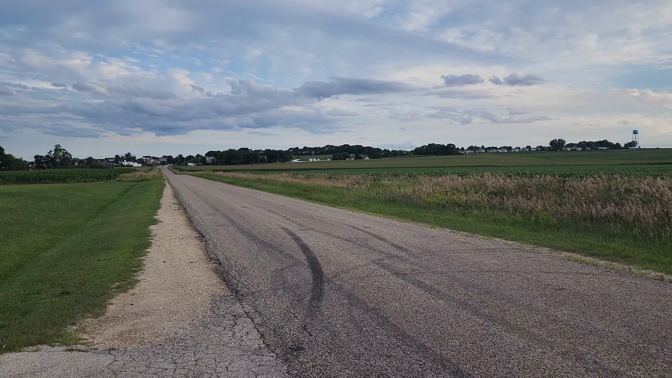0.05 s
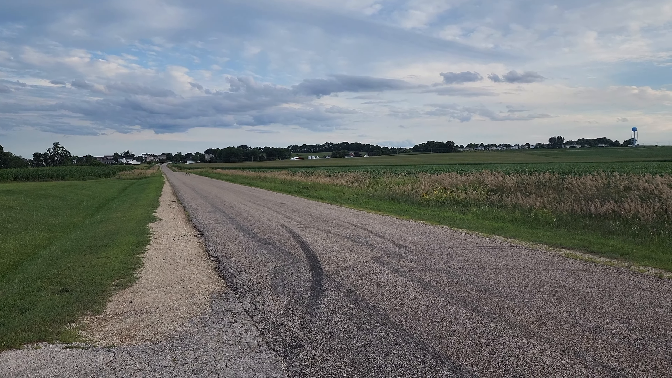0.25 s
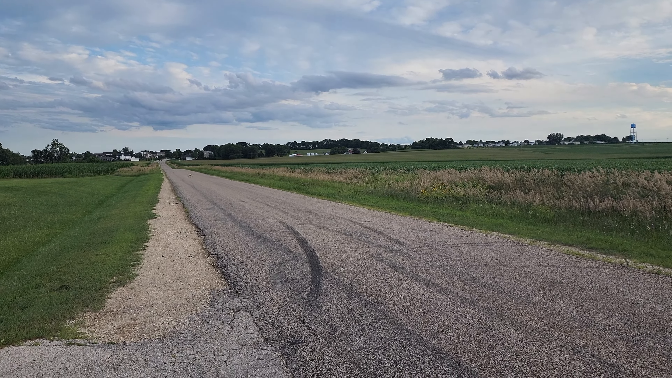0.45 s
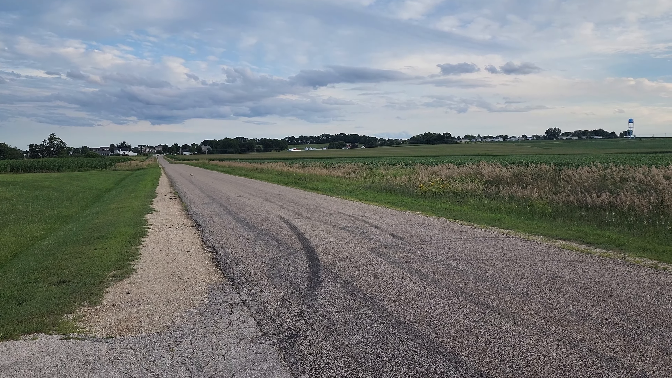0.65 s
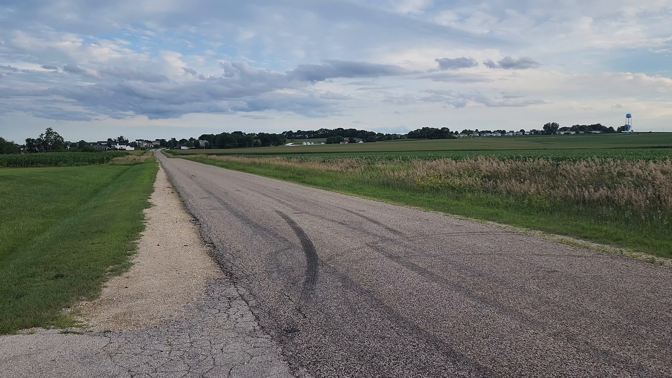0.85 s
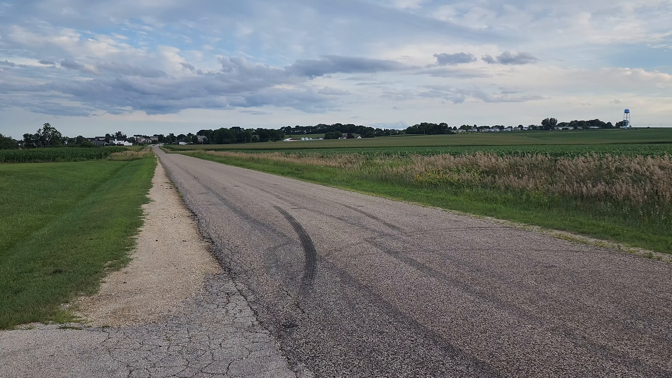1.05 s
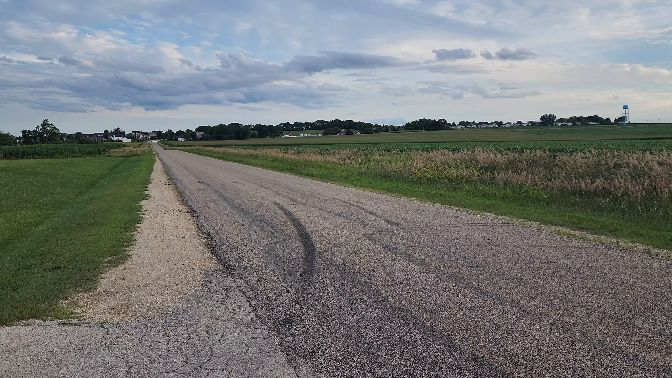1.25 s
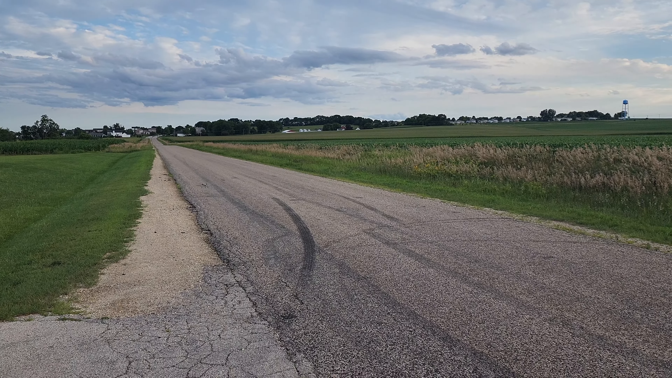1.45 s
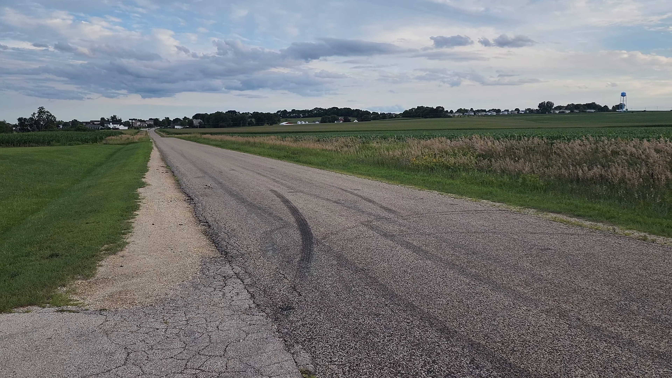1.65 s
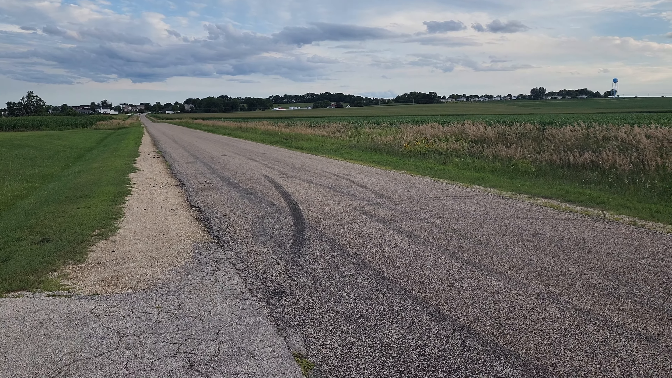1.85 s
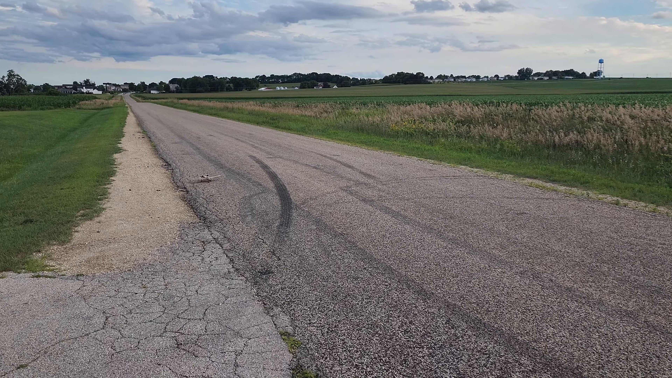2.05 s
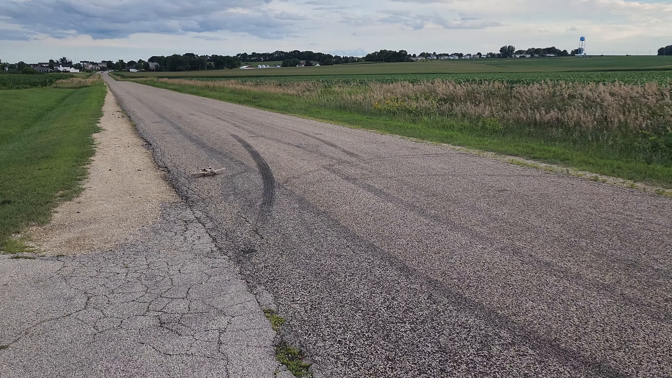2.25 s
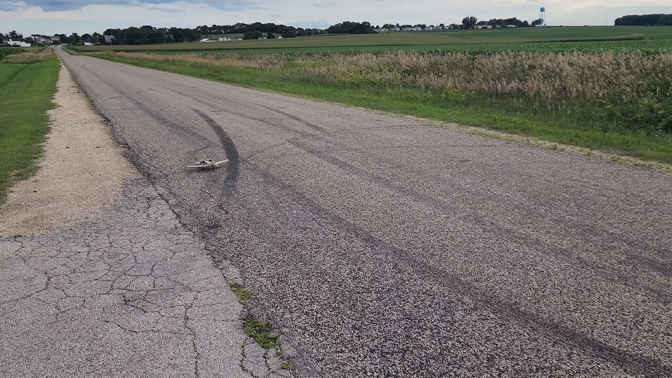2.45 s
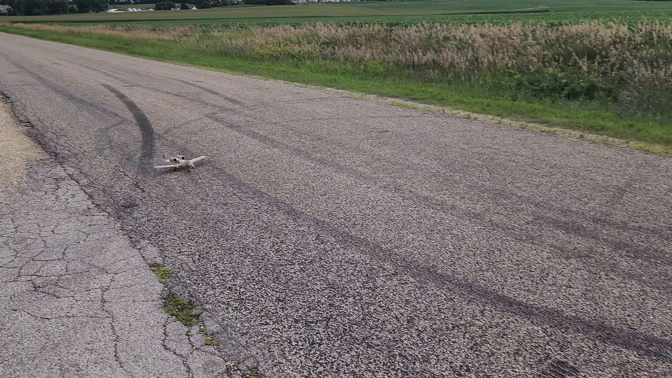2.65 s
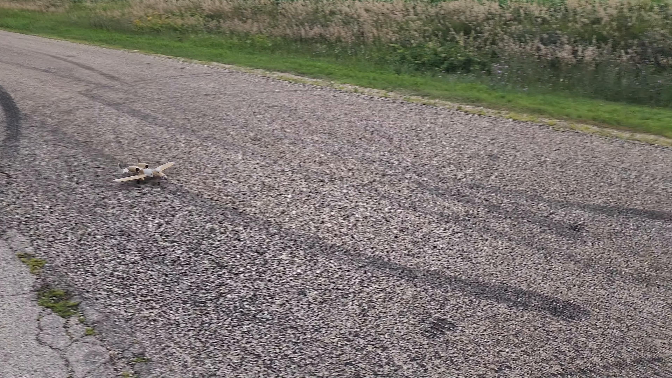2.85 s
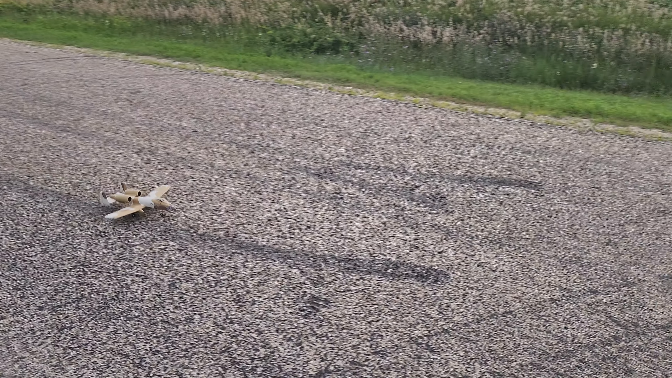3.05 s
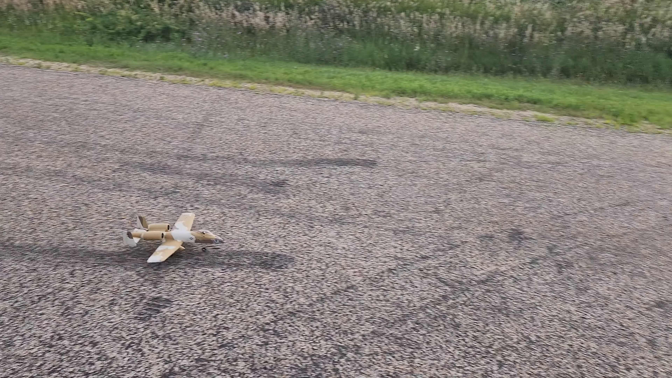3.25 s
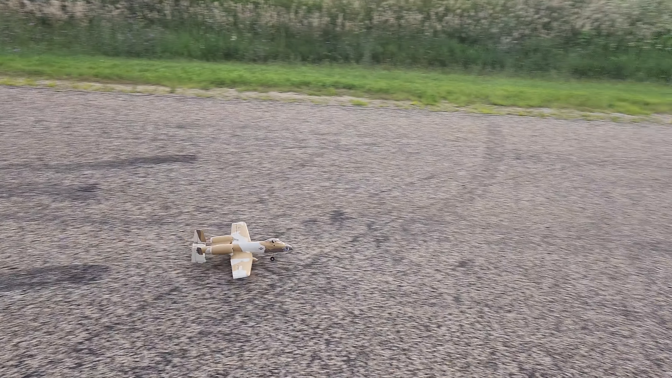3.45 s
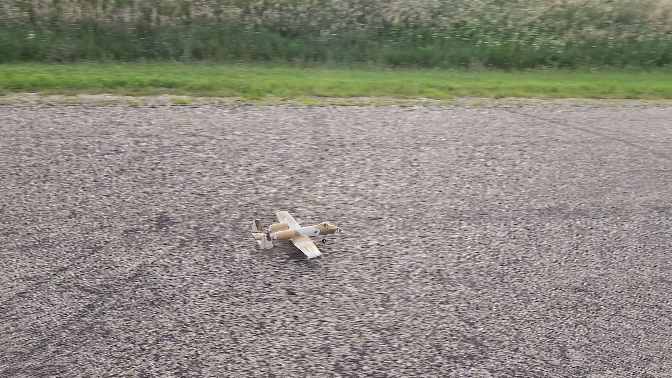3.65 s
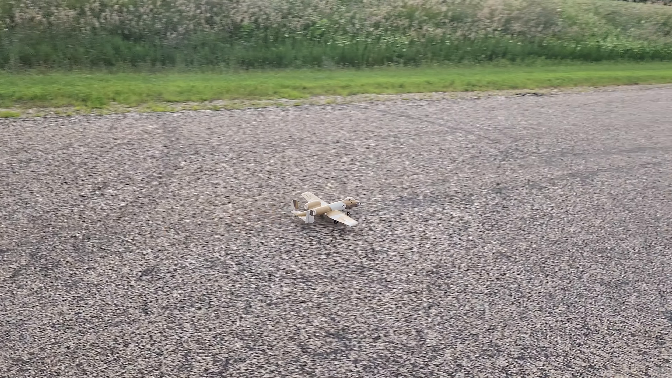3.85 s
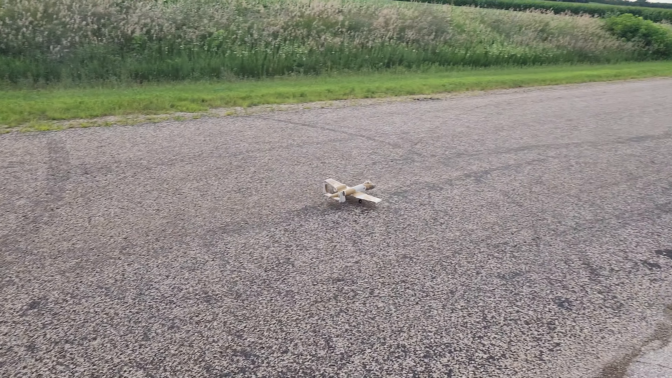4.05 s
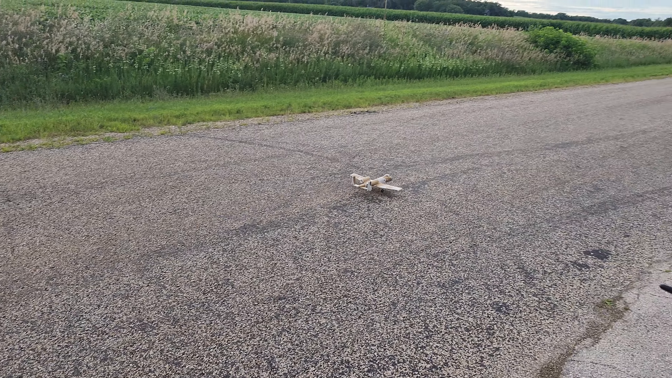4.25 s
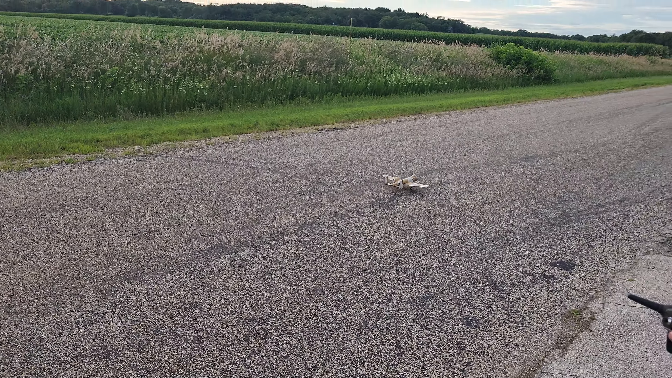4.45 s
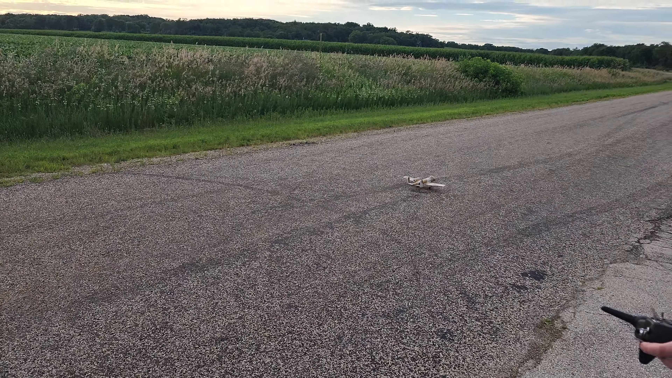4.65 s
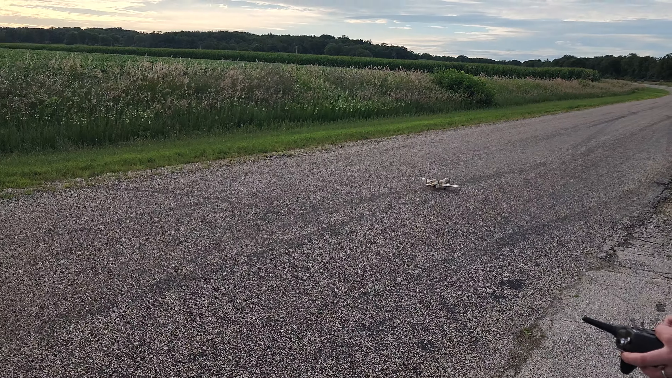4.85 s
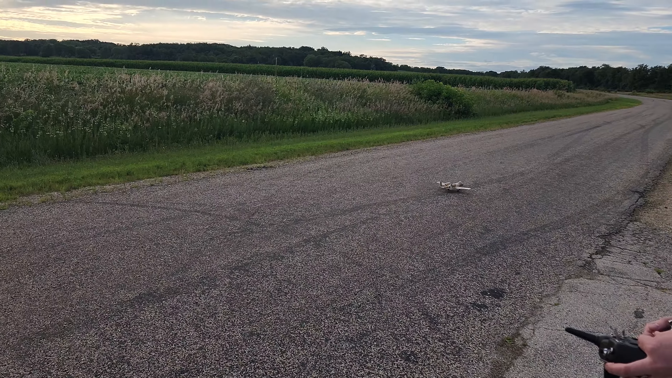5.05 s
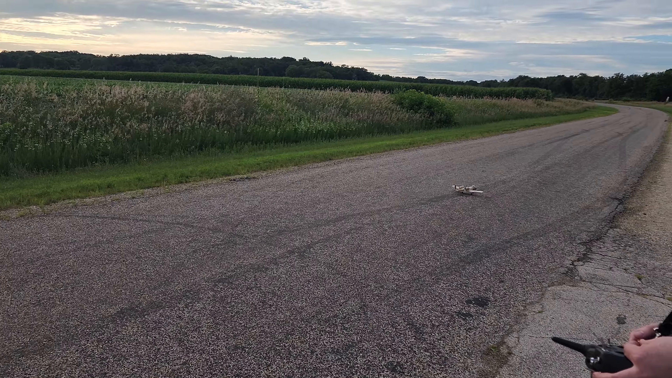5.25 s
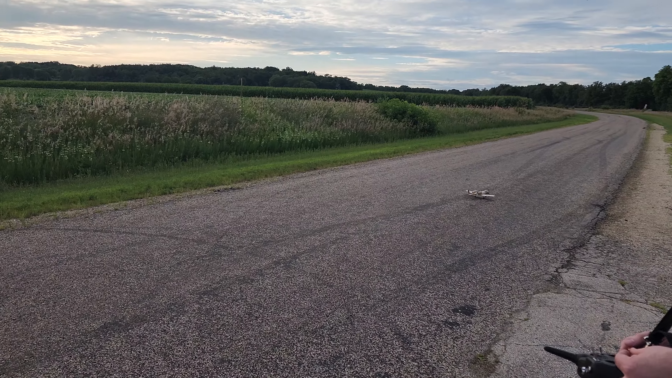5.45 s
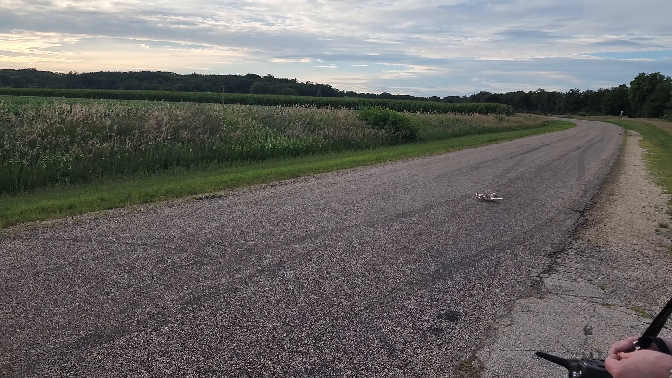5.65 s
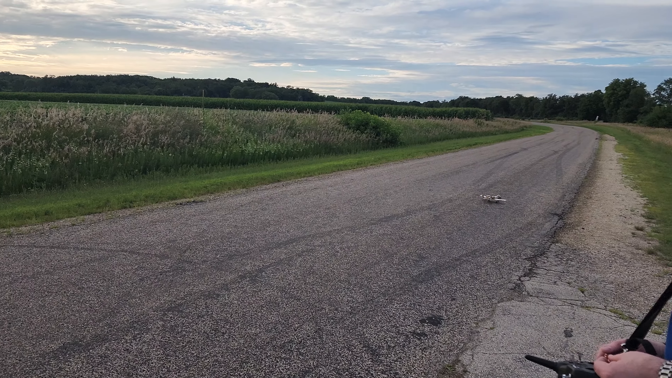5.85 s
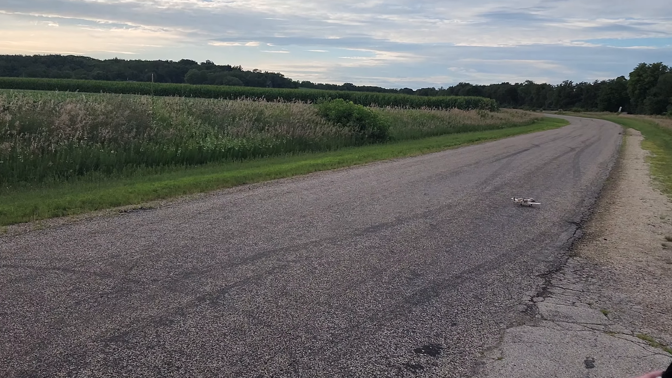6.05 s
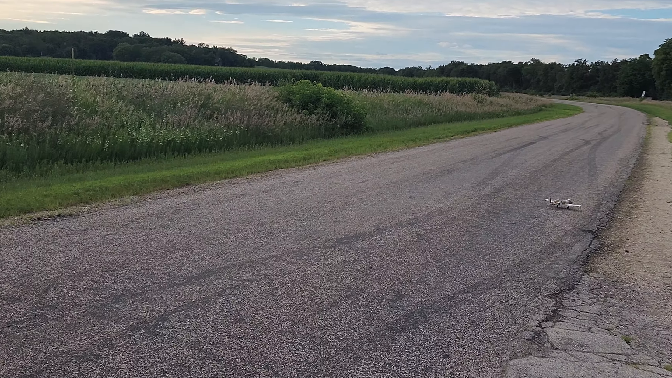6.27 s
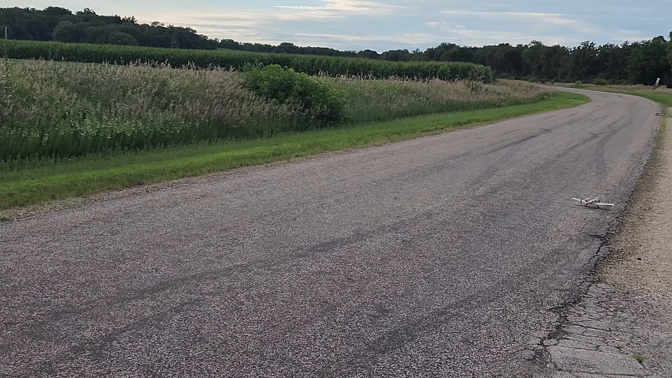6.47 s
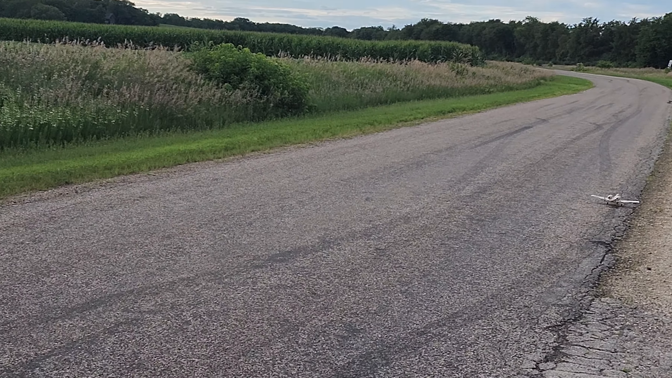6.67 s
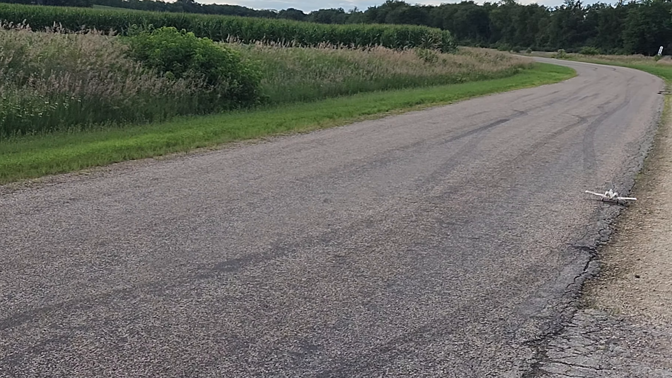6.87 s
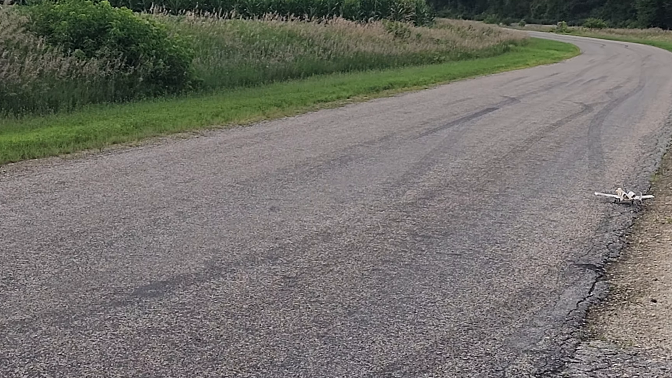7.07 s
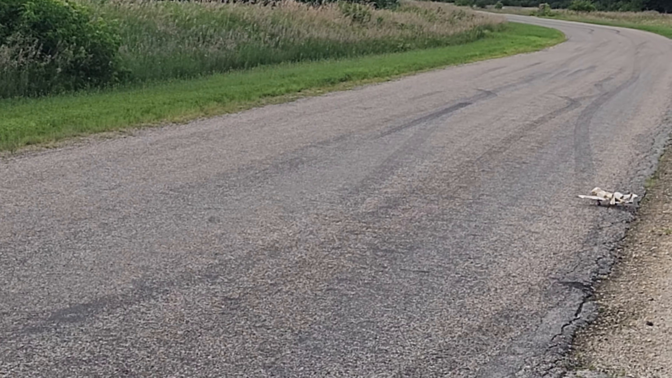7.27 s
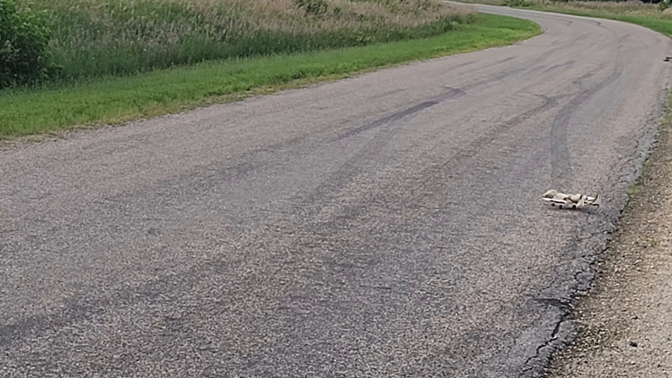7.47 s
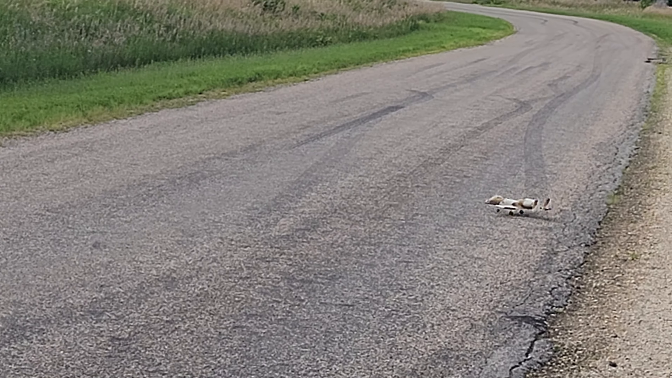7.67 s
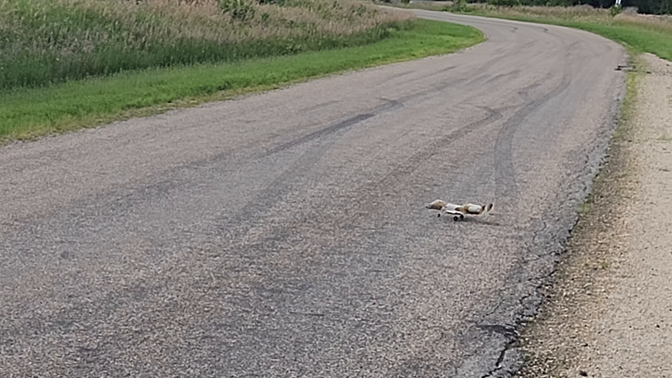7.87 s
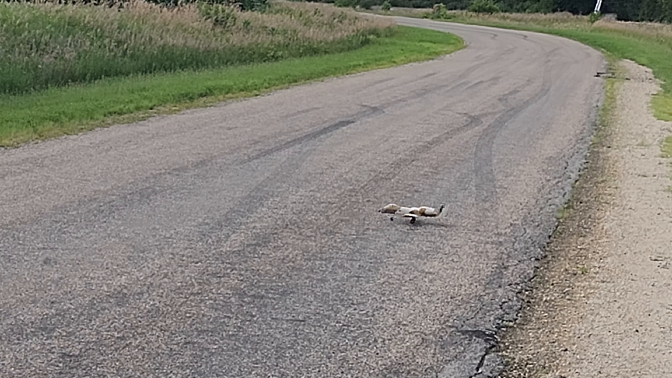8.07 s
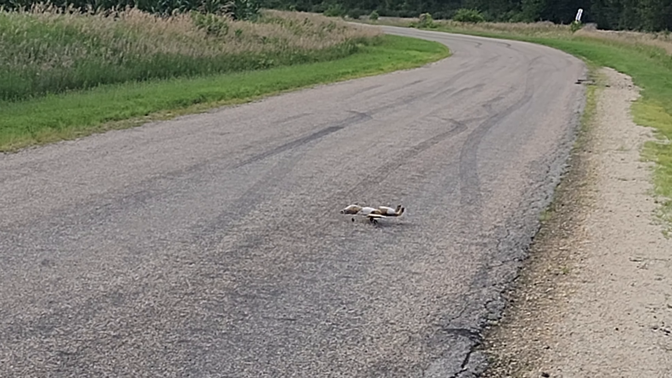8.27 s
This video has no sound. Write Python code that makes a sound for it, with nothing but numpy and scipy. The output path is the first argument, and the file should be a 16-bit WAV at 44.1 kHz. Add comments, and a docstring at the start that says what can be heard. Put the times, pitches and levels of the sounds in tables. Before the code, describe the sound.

A small electric model jet whines in, lands and rattles past on gritty asphalt, then its fans restart and rise in pitch.

```python
"""Model jet landing on asphalt

Open field, a hand-held stereo pair beside a coarse asphalt strip. A small jet with two electric ducted
fans glides in whining, throttles back, lands and rolls by 2 m away, grit drumming on its foam body.
It turns round, the fans start again, and it taxis back with two steps of throttle. Light wind rumbles
on the microphones, the hand knocks the case, a finger rubs the left port; far off, a bird chirps."""
import sys
import numpy as np
from scipy import signal
from scipy.fft import rfft, irfft, next_fast_len
from scipy.io import wavfile
from scipy.ndimage import uniform_filter1d, map_coordinates

SR = 44100
rng = np.random.default_rng(int(sys.argv[2]) if len(sys.argv) > 2 else 0)


def bounce(signal):
    """Save signal as a 16-bit WAV file at the path given by the first command-line argument."""
    frames = np.transpose(np.atleast_2d(signal))
    limited = np.clip(frames, -1, 1)
    pcm = np.round(limited * 32767).astype(np.int16)
    wavfile.write(sys.argv[1], SR, pcm)


N = 366468
TIME = np.arange(N) / SR

# the breeze freshens at the microphones: (time [s], level [dB])
BREEZE = [(0, -55), (2.5, -52.5), (5, -53), (5.7, -49.5), (8.31, -47)]
# gusts and lulls on top of it: (time [s], half-length [s], gain [dB])
GUSTS = [(0.042, 0.097, 4.5), (1.787, 0.13, 5.5), (2.79, .2, -1.5), (3.1, 0.11, 3.5), (3.39, 0.29, 0),
         (4.722, 0.055, 7), (6.787, 0.25, 3.5), (7.94, 0.13, 5)]
# wind on the ports, and the hush of the field: (frequency [Hz], level [dB])
RUMBLE_COLOUR = [(20, -12), (45, 1.5), (100, 2), (190, -6), (280, -14.5), (450, -38), (1000, -67)]
FIELD_COLOUR = [(100, 14), (500, -2), (850, 9), (1300, 1.5), (2500, -6), (4000, -7), (8000, -4),
                (15000, -24)]

# throttle on the approach: (time [s], blade-passing target [Hz], lag [s], blade tone [dB], whine [dB])
LANDING_THROTTLE = [(0, 3021, .1, -52, -79), (.19, 2969.5, 0.23, -51, -81), (1.36, 2900.5, .22, -49.5, -56),
                    (1.865, 2969, 0.0154, -47.5, -65), (1.92, 2803, .06, -66, -68),
                    (1.995, 2110, .014, -48.5, -44), (2.06, 2100, .03, -55, -42.5),
                    (2.11, 1999.5, .17, -62, -46), (2.25, 1.5, 0.23, -50, -52), (2.3, 1.5, .29, -50, -115)]
# how far the second fan's blade tone lies below the first: (time [s], beat [Hz])
LANDING_BEAT = [(0, 124), (1.99, 106), (2.03, 80), (2.25, 70), (2.5, 30)]
TAXI_BEAT = [(7.8, 8), (8.0, 25), (8.04, 27), (8.075, 9), (8.15, 15), (8.31, 29)]
# lines of the motor whine: (shaft order [multiple], level [dB])
LANDING_WHINE_ORDERS = [(24, 5), (33, -13), (40, -21), (56, -32)]
TAXI_WHINE_ORDERS = [(16, -5.5), (24, 0), (32, -15), (40, -9), (48, -18), (56, -17)]
# how well the motor housing radiates: (frequency [Hz], gain [dB])
MOTOR_SHELL = [(2900, -1), (4000, -18), (5200, -4.5), (6300, -3), (8500, -6.5), (10700, 8.5), (15000, 5)]
# lines that unequal blades make strong or weak: (shaft order [multiple], level over the others [dB])
LANDING_BUZZ_ORDERS = [(15, 3), (16, 5), (17, 6), (18, 0)]
TAXI_BUZZ_ORDERS = [(4, 7), (6, 2), (7, 4), (9, -7), (10, 10), (11, -2), (12, 3), (13, 2), (14, 3), (15, 7),
                    (16, -2), (17, -7), (18, 7), (19, 6), (20, 2), (23, 5)]
# nose on: intake hiss, blade buzz and the hollow rush of the glide: (frequency [Hz], level [dB])
INTAKE_HISS = [(300, -33), (850, 0.5), (1200, -3.5), (2400, 3), (3000, 7), (4200, -107), (5300, 5.5),
               (6400, 11), (7500, 0), (8800, -2), (10300, -7), (12500, -4), (15000, -10)]
INTAKE_BUZZ = [(400, -19), (1000, -63), (1460, -9), (2400, -22), (3300, 8), (4200, -23), (5500, -4),
               (6250, 2.5), (7200, -21), (8500, -8), (10300, -20), (12000, -4), (13000, -11), (15000, 4)]
GLIDE_RUSH = [(500, -37), (740, -2), (860, 3), (1000, -12), (1300, -22)]
# hiss and buzz swell and sink on the approach: (time [s], gain [dB])
APPROACH_SWELL = [(0, 5.5), (.2, 1), (.38, 1), (.7, 1.5), (1, 0.5), (1.18, -1), (1.5, 3), (1.85, 2),
                  (2.1, 0.5)]
# the echo off the asphalt closes in on the direct sound as the jet sinks: (time [s], delay [ms])
ROAD_ECHO = [(0, 0.48), (1.62, 0.13), (2.1, 0.15), (2.6, 0.16), (2.95, 0.16), (3.25, 0.16), (3.5, 0.15),
             (4.1, 0.15), (5.4, 0.15)]
# the jet's bearing from the microphones: (time [s], left port's lead [ms])
BEARING = [(0, 0.13), (2.5, 0.14), (3.15, 0.21), (3.5, 0.13), (4.05, 0.056), (4.65, -0.013), (5.5, -0.053),
           (6.3, -0.062), (7.05, -0.017), (7.7, 0.041)]
# the case shades the ports, for a source on each side: (frequency [Hz], left minus right [dB])
SHADE_LEFT = [(1000, 0), (2000, 2.5), (2700, 2), (4000, 1), (5300, -3), (6500, 3), (8000, 19), (9700, -19),
              (11000, 19), (12200, 13), (13500, 17), (15000, 15)]
SHADE_FRONT = [(1000, 1), (2000, -6), (2700, -1.5), (4000, 2), (5300, 5), (6500, -3.5), (8000, 1),
               (9700, 4), (11000, -19), (12200, 18), (13500, -2), (15000, 3)]
SHADE_RIGHT = [(1000, -5), (2000, 5), (2700, 6.5), (4000, 2.5), (5300, 12.5), (6500, 2.5), (8000, 30),
               (9700, -5.5), (11000, 15), (12200, 5), (13500, 11), (15000, 15)]

# the hand on the case: (time [s], pitch [Hz], level [dB], time to fall 60 dB [s])
KNOCKS = [(.338, 240, -34.5, 0.04)]
# a bird far out in the field: (time [s], length [s], start pitch [Hz], end pitch [Hz], level [dB])
CHIRPS = [(4.77, .15, 3150, 2650, -52), (1.679, .012, 2850, 2050, -56), (1.709, .013, 2050, 2800, -55),
          (1.724, .017, 2800, 1800, -54)]
# a dry scuff: (frequency [Hz], level [dB])
SCUFF_COLOUR = [(2500, -35), (3300, 1), (4100, 0), (4700, -8), (5500, -35)]

# wheel noise coming, abeam and going away: (frequency [Hz], level [dB])
ROLL_COMING = [(100, -36), (300, -11.5), (600, -7), (1100, 5.5), (1900, -5), (2600, 2), (4400, -19.5),
               (5500, -9), (6600, -7.5), (7600, -4), (8800, -11.5), (12000, -14), (13400, -23),
               (15000, -17)]
ROLL_BESIDE = [(100, -30), (300, -9.5), (700, -7), (1050, -9.5), (1400, -5), (2200, -4), (3000, -4),
               (4500, -8.5), (5700, -13), (7600, -13), (9000, -3.5), (11500, -17.5), (13200, -14.5),
               (15000, -10.5)]
ROLL_GOING = [(100, -31), (300, -10.5), (550, -13.5), (750, -7.5), (1060, -3), (1650, -9.5), (2000, 2),
              (2600, -9.5), (3300, 0), (4000, -5.5), (5300, -13.5), (6600, -15), (7700, -11.5),
              (10200, -8.5), (13300, -20), (15000, -12)]
# wheels hit road or stone: (time [s], level [dB], time to fall 60 dB [s], thud over rattle [dB])
BUMPS = [(2.146, -34, .14, -22), (2.218, -38, .08, -18), (2.415, -33, .16, -20), (2.568, -40, .06, -8),
         (2.705, -31, .008, -14), (2.865, -37, .08, -8), (3.101, -28, .012, -14), (3.32, -31, .06, -1),
         (3.374, -30, .05, -10), (3.553, -29, .07, -14), (3.63, -31, .05, -14), (3.756, -27, .05, -14),
         (3.818, -31, .05, -14), (3.917, -32, .04, -14), (3.946, -34, .04, -3), (3.972, -31, .06, -1),
         (4.048, -35, .03, -14), (4.251, -36, .03, -16), (4.294, -33, .04, -18), (4.319, -31, .06, -18),
         (4.423, -35, .07, -15), (4.459, -36, .03, -16), (4.526, -34, .04, -16), (4.587, -33, .015, -16),
         (4.843, -36, .02, -14), (5.149, -38, .07, -16), (5.292, -39, .02, -16), (6.087, -39, .01, -22),
         (6.098, -38, .015, -22), (6.805, -33, .008, -18), (7.208, -35, .03, -20), (7.298, -35, .015, -20),
         (7.423, -28, .006, -24), (7.771, -35, .015, -14)]
# modes of the foam body: (frequency [Hz], level [dB], time to fall 60 dB [s])
FOAM_MODES = [(202, -12, 0.074), (272, -1, 0.078), (391, -2.5, 0.084)]
# peaks and dips that swell and fade in the wheel rattle and in the fan sound:
# (frequency [Hz], half-width [Hz], gain [dB], time [s], half-length [s], glide [Hz/s])
RATTLE_BANDS = [(1340, 144, 8.5, 4, 0.62, 2), (1970, 160, 1.5, 5.8, 0.22, 0), (5420, 340, 11, 4.2, 0.28, 0),
                (7700, 400, 10, 4.72, 0.22, 0), (9680, 690, 7.5, 3.2, 0.66, -700),
                (7550, 330, 10, 3.79, .35, 1), (13300, 540, 9, 4.3, 0.38, -300),
                (11300, 3200, 5, 3.94, 0.2, 0), (2930, 280, -9, 3.12, 0.35, 502),
                (3300, 210, -16, 4.6, .7, -120), (11800, 700, -3.5, 3.06, 0.59, -900),
                (6630, 720, 4, 3.48, 0.15, -1500), (500, 51, -8, 5.9, 0.98, 2)]
FAN_BANDS = [(8150, 480, 6, 6.33, 0.25, -1200), (12700, 660, -1, 7, .3, -600), (15400, 1400, -17, 7, .4, 0),
             (10600, 820, -8, 6.75, 0.13, 900), (14000, 1100, 14, 7.26, 0.32, 598),
             (3420, 190, -4.5, 7.24, 0.3, 0), (9300, 620, 0, 7.35, .22, -2200)]

# finger strokes right at the left port: (time [s], length [s], level [dB])
RUBS = [(5.436, .02, -44), (5.536, .045, -37), (5.595, .04, -38), (5.642, .02, -34), (5.686, .02, -43),
        (5.763, .025, -41.5), (5.795, .025, -41), (5.85, .03, -39), (5.868, .028, -32), (5.968, .035, -44),
        (6.048, .04, -50)]
# skin dragging on the case: (frequency [Hz], level [dB])
SKIN_COLOUR = [(60, 14.5), (200, 11), (450, -1), (1200, 8), (3000, 1.5), (6000, 1.5), (9000, 0.5),
               (12000, -11), (15000, -3)]
# the fingertip snaps free: (time [s], level [dB])
SNAPS = [(5.6275, -15), (5.684, -17), (5.9775, -10)]

# throttle while taxiing:
# (time [s], blade-passing target [Hz], lag [s], blade tone [dB], whine [dB], rush [dB], buzz [dB])
TAXI_THROTTLE = [(6.18, 975, .1, -62, -53, -45, -56), (6.2, 1000, 0.13, -57.5, -54, -48.5, -57),
                 (7.11, 1122, .06, -50.5, -56.5, -46.5, -51), (7.703, 1400, .045, -55.5, -54, -43.5, -50),
                 (7.744, 2125, .02, -53, -60, -49, -52), (7.79, 2125, .015, -59.5, -62.5, -51, -52),
                 (7.92, 2250, .08, -59.5, -62.5, -50, -52), (7.991, 2900, .031, -42, -72, -45, -50),
                 (8.045, 3135, .11, -37.5, -90, -42, -57)]
# the ducts' rush at idle and at speed, and their buzz: (frequency [Hz], level [dB])
DUCT_IDLE = [(400, -31), (750, -59), (1000, 2.5), (1350, -4.5), (2000, 3), (2700, 4.5), (3250, 6.5),
             (3800, -2.5), (5000, -6), (6300, -0.5), (7500, -5.5), (10000, 1), (12000, -8), (15000, -14)]
DUCT_FAST = [(400, -31), (900, -41), (1200, -6), (1700, -5.5), (2500, 4.5), (3300, 6), (4300, -17),
             (5500, -25), (6300, 3.5), (7500, -30), (10000, -6), (12000, -34), (15000, -31)]
DUCT_BUZZ = [(390, -11.5), (560, -44), (850, -42), (1100, 3), (1400, -15.5), (1680, 4), (1950, -15),
             (2300, 0.5), (2650, 0), (2950, -6), (3350, 11), (3900, 2), (4300, 0.5), (4750, 5.5),
             (5300, -8), (6300, -2), (7500, -17)]
# duct resonances, heard from the front: (frequency [Hz], half-width [Hz], level [dB])
DUCT_MODES = [(3294, 82, -42.5), (4710, 660, -45), (6330, 220, -50.5)]
# lines from rotor unbalance at speed: (shaft order [multiple], level [dB])
UNBALANCE = [(1, -55), (3, -50), (6, -42.5), (7, -47), (9, -41.5), (16, -49)]

BLADES = 8
CLOSEST_S, CLOSEST_M, ROLL_M_PER_S = 3.49, 2.03, 7.36  # the landing roll past the microphones
INTAKE_ECHO_GAIN, WHEEL_ECHO_GAIN = 0.78, 0.55  # reflection off the asphalt


def amp(db):
    """Decibels to gain."""
    return 10 ** (np.asarray(db) / 20)


def unit(x):
    """Scale to rms 1."""
    return x / np.sqrt(np.mean(x ** 2) + 1e-20)


def along(points, hz):
    """(frequency, value) points read on a log axis."""
    freqs, values = np.transpose(points)
    return np.interp(np.log(hz + 1), np.log(freqs + 1), values)


def curves(rows):
    """One value per sample for each column after the time."""
    times, *columns = np.transpose(rows)
    return [np.interp(TIME, times, column) for column in columns]


def ramp(start, end):
    """Rises from 0 to 1 between two times."""
    return np.clip((TIME - start) / (end - start), 0, 1)


def bell(x, centre, half):
    """A smooth hump of height 1."""
    return np.exp(-((x - centre) / half) ** 2)


def wobble(rate):
    """A smooth random curve, rate knots a second."""
    return map_coordinates(rng.standard_normal(int(N * rate / SR) + 4), [TIME * rate])


def filtered(x, response):
    """x times a response of frequency."""
    size = next_fast_len(N + SR // 4)
    return irfft(rfft(x, size) * response(np.fft.rfftfreq(size, 1 / SR)), size)[..., :N]


def coloured(x, spectrum):
    """x given a spectrum, at rms 1."""
    return unit(filtered(x, lambda hz: amp(along(spectrum, hz))))


def noise(spectrum):
    """Fresh noise of rms 1 with a spectrum."""
    return coloured(rng.standard_normal(N), spectrum)


def wind():
    """A low, lumpy rumble, nearly alike at both microphones, over the wide hush of open fields."""
    level_db = curves(BREEZE)[0] + sum(db * bell(TIME, s, half) for s, half, db in GUSTS)
    rumble = noise(RUMBLE_COLOUR) + amp(-15.5) * np.array([noise(RUMBLE_COLOUR) for _ in range(2)])
    hush = noise(FIELD_COLOUR) + amp(7.5) * np.array([noise(FIELD_COLOUR) for _ in range(2)])
    return amp(level_db + 1.34 * wobble(31)) * rumble + amp(-71.5) * hush


def throttle(moves, thumb_s=0.0146):
    """Fan speed and levels per sample: after each move of the stick they settle on new values."""
    out = np.outer(moves[0][1:2] + moves[0][3:], np.ones(N))
    for s, hz, lag, *levels in moves[1:]:
        start = int(s * SR)
        aim = np.array([hz, *levels])[:, None]
        out[:, start:] = aim + (out[:, [start]] - aim) * np.exp(-TIME[:N - start] / lag)
    return uniform_filter1d(out, int(thumb_s * SR), axis=1)


def shaft(blade_hz, jitter):
    """Angle of a rotor whose speed trembles a little."""
    return 2 * np.pi * np.cumsum(blade_hz / BLADES * (1 + jitter * wobble(90))) / SR


def partials(angle, orders, flicker_db):
    """Multiples of the shaft speed, each flickering in the turbulent inflow."""
    return sum(amp(db + flicker_db * wobble(25)) * np.sin(order * angle + rng.uniform(0, 2 * np.pi))
               for order, db in orders)


def buzz(angle, orders, count=36, size=1024):
    """Unequal blades make a rough pressure pattern that repeats once a turn."""
    levels_db = 2 * rng.standard_normal(count + 1)
    for order, db in orders:
        levels_db[order] = db
    lines = amp(levels_db) * np.exp(2j * np.pi * rng.random(count + 1))
    lines[[0, BLADES]] = 0  # no offset, no blade tone
    pattern = unit(irfft(lines, size))
    return np.interp(angle / (2 * np.pi) % 1, np.linspace(0, 1, size + 1), np.r_[pattern, pattern[0]])


def stirred(x, depth_db, patch_hz=520, patch_s=0.09):
    """Turbulent air lifts and sinks each band on its own."""
    spectra = signal.stft(x, SR, nperseg=512)[2]
    bands, frames = round(patch_hz * 512 / SR), round(patch_s * SR / 256)
    patches = uniform_filter1d(rng.standard_normal(spectra.shape), bands, 0)
    patches = uniform_filter1d(patches, frames, 1)
    return signal.istft(spectra * unit(amp(depth_db * unit(patches))), SR, nperseg=512)[1][:N]


def twin_fans(blade_hz, beat, blade_db, whine_db, buzz_db, buzz_colour, buzz_orders, whine_orders,
              twin_db, jitter, waver_db, rough_rad, octave_db, buzz_flutter_db):
    """Blade tone, motor whine and buzz of two fans; the second runs a little slower, so they beat."""
    first = shaft(blade_hz, jitter)
    second = first - shaft(curves(beat)[0], jitter=0)
    out = np.zeros(N)
    for angle, gain in [(first, 1), (second, amp(twin_db))]:
        tone = np.sin(BLADES * angle) + amp(octave_db) * np.sin(2 * BLADES * angle)
        tone *= amp(blade_db + waver_db * wobble(30))
        tone *= 1 + 0.075 * waver_db * wobble(210)  # eddies drawn into the fan chop the tone
        whine = amp(whine_db) * partials(angle, whine_orders, flicker_db=2.5)
        motor = filtered(whine, lambda hz: amp(along(MOTOR_SHELL, hz)))
        rasp = buzz(angle + rough_rad * wobble(170), buzz_orders)
        rasp = coloured(stirred(rasp, depth_db=2.3), buzz_colour)
        out += gain * (tone + motor + amp(buzz_db + buzz_flutter_db * wobble(25)) * rasp)
    return out * np.sqrt(2 / (1 + amp(twin_db) ** 2))


def over_road(x, gain):
    """The direct sound plus its echo off the asphalt: a comb whose teeth move with the jet."""
    delay_ms, = curves(ROAD_ECHO)
    return x + gain * map_coordinates(x, [np.arange(N) - delay_ms * SR / 1000])


def landing(nearing_db_per_s=8, fade_db_per_s=11):
    """Nose on to the microphones, the intakes hiss; the throttle is cut and the fans run down."""
    blade_hz, blade_db, whine_db = throttle(LANDING_THROTTLE)
    blade_db += 9.5 * ramp(2.25, 2.28)  # the blades whistle louder as they coast down
    rush_db = -67.5 + nearing_db_per_s * np.minimum(TIME, 2.22) + curves(APPROACH_SWELL)[0]
    rush_db += 4 * ramp(2.2, 2.201)  # the hiss steps up just after touchdown
    rush_db -= fade_db_per_s * np.maximum(TIME - 2.3, 0)
    tones = twin_fans(blade_hz, LANDING_BEAT, blade_db, whine_db, rush_db - 6, INTAKE_BUZZ,
                      LANDING_BUZZ_ORDERS, LANDING_WHINE_ORDERS, twin_db=-15, jitter=0.00048,
                      waver_db=1.5, rough_rad=0.024, octave_db=-34, buzz_flutter_db=3)
    glide = amp(-64) * bell(TIME, 1.1, 0.31) * noise(GLIDE_RUSH)
    hiss = amp(rush_db - 3.5) * over_road(noise(INTAKE_HISS), INTAKE_ECHO_GAIN)
    return tones * (1 - ramp(2.45, 2.51)) + glide + hiss


def hand_knock(attack_s=0.0082):
    """The hand knocks softly on the case that holds the microphones."""
    out = np.zeros(N)
    for s, hz, db, t60 in KNOCKS:
        age = np.maximum(TIME - s, 0)
        out += amp(db - 60 * age / t60) * ramp(s, s + attack_s) * np.sin(2 * np.pi * hz * age)
    return out


def bird():
    """Far off to the right: quick, scratchy squeaks, later a thin falling whistle."""
    out = np.zeros(N)
    for s, length, from_hz, to_hz, db in CHIRPS:
        progress = np.clip((TIME - s) / length, 0, 1)
        hz = from_hz + (to_hz - from_hz) * progress + 50 * wobble(350)
        envelope = np.sqrt(np.abs(np.sin(np.pi * progress)))
        out += amp(db) * envelope * np.sin(2 * np.pi * np.cumsum(hz) / SR)
    return out * amp([[-3], [2]])


def scuff():
    """A faint dry scuff, centred, just before the throttle is cut."""
    return amp(-63) * bell(TIME, 1.862, 0.029) * noise(SCUFF_COLOUR)


def grit(per_s, spread_db, scrape):
    """Tiny random impacts over a bed of scraping."""
    hits = (rng.random(N) < per_s / SR) * rng.standard_normal(N)
    hits *= amp(spread_db * np.minimum(rng.exponential(size=N), 4))
    return unit(hits) + scrape * rng.standard_normal(N)


def swept(x, bands):
    """Gliding peaks and dips swell and fade in turn."""
    hz, t, spectra = signal.stft(x, SR, nperseg=1024)
    lift_db = sum(db * bell(hz[:, None], centre + glide * (t - s), width) * bell(t, s, half)
                  for centre, width, db, s, half, glide in bands)
    return signal.istft(spectra * amp(lift_db), SR, nperseg=1024)[1][:N]


def wheels(hiss_loss_db_per_m=0.22, hop_hz=9.2, crossover_hz=3300):
    """Grit rattles the foam airframe and hisses under the tyres, loudest as the jet passes close by."""
    track_m = ROLL_M_PER_S * (TIME - CLOSEST_S)
    distance_m = np.hypot(track_m, CLOSEST_M)
    ahead = -track_m / distance_m  # near 1 coming, near -1 going
    touchdown, crawl = ramp(2.09, 2.136), ramp(5.68, 6.7)
    rolling = CLOSEST_M / distance_m * (1 - crawl)
    rattle = rolling * amp(-32.5 + 0.2 * ahead) + crawl * amp(-60)
    hiss = rolling * amp(-31.5 + ahead - hiss_loss_db_per_m * distance_m) + crawl * amp(-47)
    near, past = ramp(2.32, 3.53), ramp(3.76, 4.18)
    road_db = 1.2 * wobble(35) + 1.25 * wobble(160)  # the coarse surface loads the wheels unevenly
    hop_db = 1.1 * past * np.cos(2 * np.pi * hop_hz * (TIME - 4.325))  # hopping on springy gear
    force = grit(per_s=3500, spread_db=1, scrape=0.84) * amp(road_db + hop_db)
    force = over_road(force, WHEEL_ECHO_GAIN)
    roll = np.zeros(N)
    for share, colour in [(1 - near, ROLL_COMING), (near - past, ROLL_BESIDE), (past, ROLL_GOING)]:
        whole = coloured(force, colour)
        low = filtered(whole, lambda hz: 1 / (1 + (hz / crossover_hz) ** 8))
        roll += share * (rattle * unit(low) + hiss * unit(whole - low))
    return swept(stirred(roll, depth_db=1.15) * touchdown + bumps(), RATTLE_BANDS)


def bumps():
    """Each blow shakes the airframe and thuds in its foam; the rattle changes colour once it is past."""
    shake, thud, t = np.zeros(N), np.zeros(N), TIME[:SR // 4]
    for s, db, shake_t60, thud_db in BUMPS:
        start = int(s * SR)
        span = slice(start, start + len(t))
        shake[span] += amp(db - 60 * t / shake_t60)
        for hz, mode_db, t60 in FOAM_MODES:
            detuned_hz = hz * (1 + 0.05 * rng.standard_normal())
            thud[span] += amp(db + thud_db + mode_db - 60 * t / t60) * np.sin(2 * np.pi * detuned_hz * t)
    past = ramp(3.7, 3.701)
    burst = over_road(rng.standard_normal(N), WHEEL_ECHO_GAIN)
    rattle = (1 - past) * coloured(burst, ROLL_COMING) + past * coloured(burst, ROLL_GOING)
    return shake * rattle + thud


def finger(ring_hz=170, cutoff_hz=11000):
    """Skin drags across the case right at the left port and snaps free with a sharp pressure pulse."""
    strokes = sum(amp(db) * ramp(s, s + 0.003) * (1 - ramp(s + length / 2, s + length + 0.023))
                  for s, length, db in RUBS)
    rub = amp(1) * strokes * coloured(grit(per_s=13000, spread_db=-2.5, scrape=1), SKIN_COLOUR)
    for s, db in SNAPS:
        age = np.maximum(TIME - s, 0)
        pulse = np.exp(-age / 0.00016)
        ring = 0.25 * np.exp(-age / 0.003) * np.sin(2 * np.pi * ring_hz * age)
        rub += amp(db) * (TIME >= s) * (ring - pulse)
    return filtered(rub, lambda hz: 1 / (1 + (hz / cutoff_hz) ** 4)) * amp([[1], [-17]])


def duct_ring():
    """Turbulence rings the ducts in narrow bands."""
    out = np.zeros(N)
    for centre, width, db in DUCT_MODES:
        band = filtered(rng.standard_normal(N), lambda hz: 1 / (1 + ((hz - centre) / width) ** 2))
        out += amp(db) * unit(band)
    return out


def fan_surge(blade_hz, saturation_hz_per_s=12000, lag_s=0.012):
    """Accelerating fans are louder: a saturating swell that trails the acceleration."""
    pole = np.exp(-1 / (lag_s * SR))
    acceleration = np.gradient(blade_hz) * SR
    return signal.lfilter([1 - pole], [1, -pole], np.tanh(acceleration / saturation_hz_per_s))


def taxi():
    """Down the strip the fans start abruptly as the jet turns; at speed their rush gathers near 3 kHz."""
    blade_hz, blade_db, whine_db, rush_db, buzz_db = throttle(TAXI_THROTTLE)
    surge = fan_surge(blade_hz)
    running, idling, fast = ramp(6.17, 6.21), 1 - ramp(7.74, 7.82), ramp(7.95, 8.05)
    tail = 1 - ramp(6.5, 7.05)  # the exhaust swings off the microphones
    nose = ramp(7.05, 7.585)  # the intakes swing round to face them
    blade_hz *= 1 + 0.013 * idling * (1 - nose / 2) * wobble(24)  # idling motors hunt
    blade_db += 13.5 * nose + 13 * surge
    whine_db += 16 * nose
    rush_db += 3.5 * nose + 5 * tail + 2.5 * surge
    buzz_db += 8 * nose + 2.5 * surge
    rush = np.sqrt(1 - fast) * amp(1.5) * noise(DUCT_IDLE) + np.sqrt(fast) * amp(3.5) * noise(DUCT_FAST)
    tones = twin_fans(blade_hz, TAXI_BEAT, blade_db, whine_db, buzz_db, DUCT_BUZZ, TAXI_BUZZ_ORDERS,
                      TAXI_WHINE_ORDERS, twin_db=-9 + 3 * ramp(8.06, 8.15), jitter=0.0025, waver_db=1.1,
                      rough_rad=0.065 * idling + 0.036 * (1 - idling), octave_db=-33, buzz_flutter_db=2)
    ring = amp(-8 * (1 - nose) - 29 * (1 - idling)) * duct_ring()
    unbalance = ramp(8.01, 8.14) * partials(shaft(blade_hz, jitter=0.005), UNBALANCE, flicker_db=3)
    rush = amp(rush_db + 0.34 * wobble(28)) * stirred(rush, depth_db=3.06)
    return running * swept(tones + unbalance + ring + rush, FAN_BANDS)


def stereo_pair(x, scatter_db, treble_scatter_db):
    """The jet's bearing sets delay and shading at the two ports; the ground adds diffuse scatter."""
    hz, t, spectra = signal.stft(x, SR, nperseg=256)
    abeam = np.interp(t, TIME, ramp(3.04, 3.5))  # from left to front
    turned = np.interp(t, TIME, ramp(5.59, 7.1))  # from front to right
    sides = [(SHADE_LEFT, 0.47 * (1 - abeam)), (SHADE_FRONT, abeam - turned),
             (SHADE_RIGHT, np.sqrt(turned))]
    shade_db = np.clip(sum(np.outer(along(shade, hz), share) for shade, share in sides), -20, 20)
    gains = amp([shade_db / 2, -shade_db / 2])
    gains /= np.sqrt(np.mean(gains ** 2, axis=0))
    lead_ms = np.interp(t, *np.transpose(BEARING))
    half_lead = np.exp(1j * np.pi * np.outer(hz, lead_ms) / 1000)
    direct = spectra * np.array([half_lead, half_lead.conj()])
    diffuse = signal.stft(rng.standard_normal((2, N)), SR, nperseg=256)[2]
    wet = amp(along([(2000, scatter_db), (9000, treble_scatter_db)], hz))[:, None]
    scatter = wet * np.abs(spectra) * diffuse / np.std(diffuse)
    return signal.istft(gains * (direct + scatter) / np.sqrt(1 + wet ** 2), SR, nperseg=256)[1][:, :N]


def scene():
    """From the edge of the strip: the jet left to right, handling noise up close, bird and wind."""
    fans = stereo_pair(landing() + taxi(), scatter_db=-32, treble_scatter_db=-9)
    rolling = stereo_pair(wheels(), scatter_db=-10, treble_scatter_db=5.5)
    return fans + rolling + finger() + hand_knock() + scuff() + bird() + wind()


def record(dry, top_hz=15900):
    """The hand-held rig passes nothing above its band limit."""
    return filtered(dry, lambda hz: hz < top_hz)


dry = scene()
out = record(dry)
bounce(out)
```